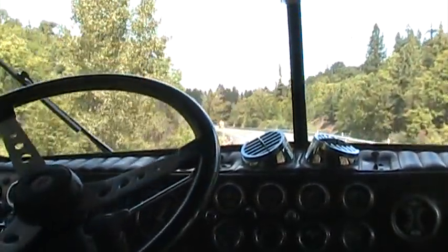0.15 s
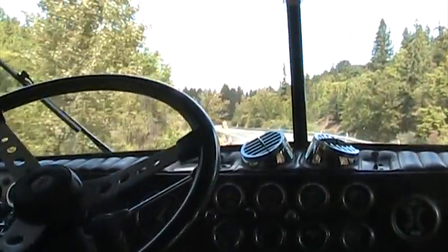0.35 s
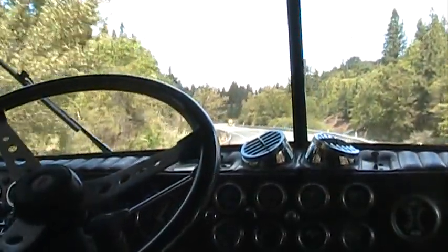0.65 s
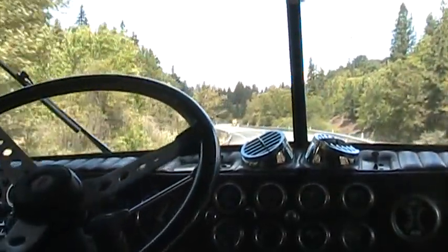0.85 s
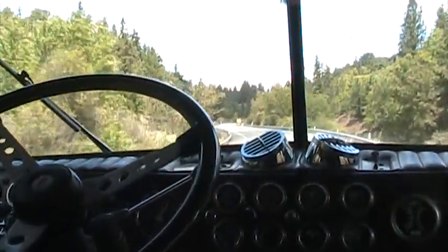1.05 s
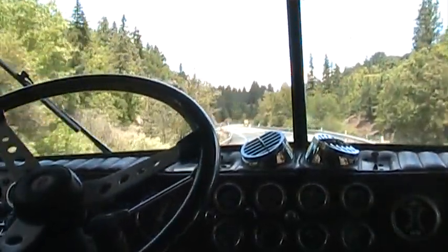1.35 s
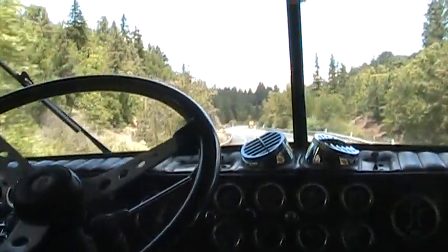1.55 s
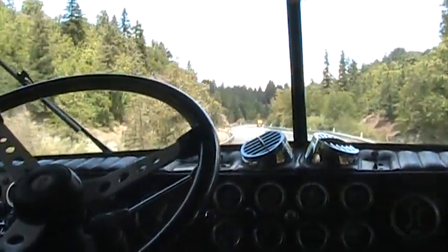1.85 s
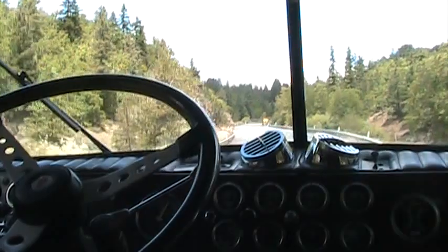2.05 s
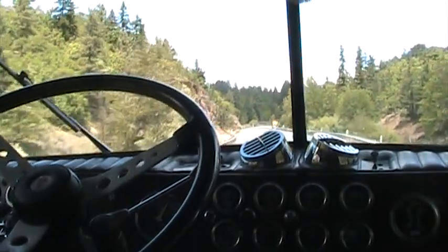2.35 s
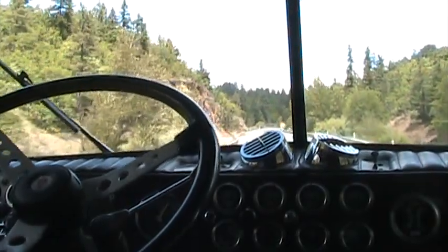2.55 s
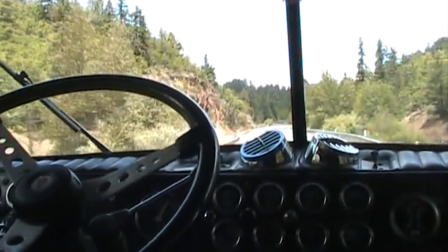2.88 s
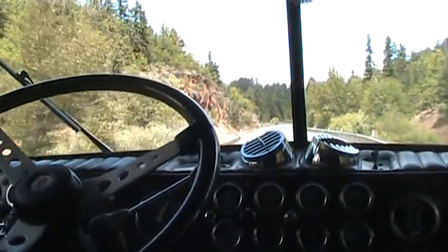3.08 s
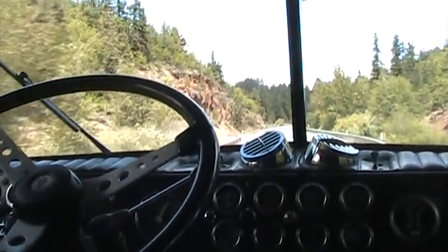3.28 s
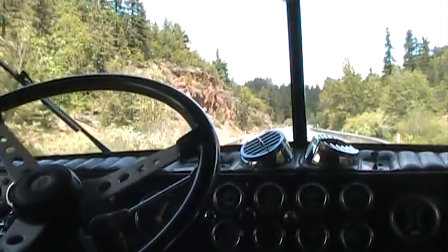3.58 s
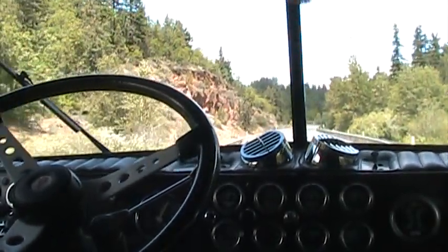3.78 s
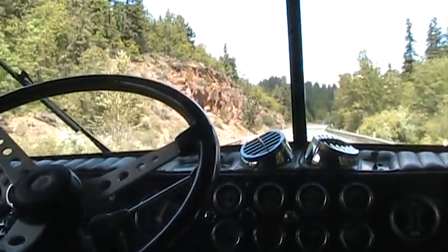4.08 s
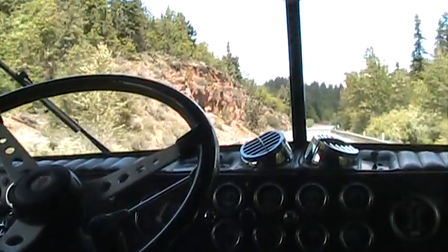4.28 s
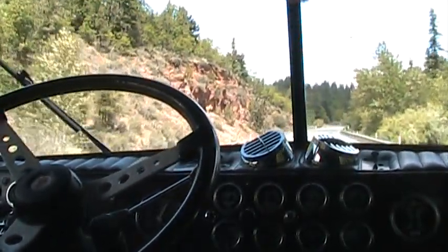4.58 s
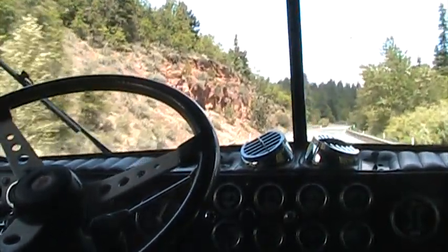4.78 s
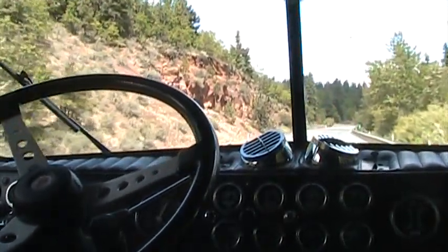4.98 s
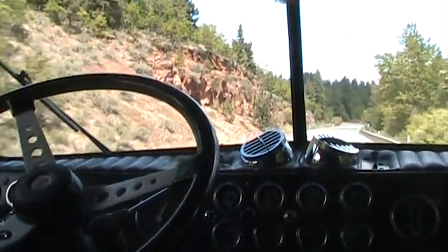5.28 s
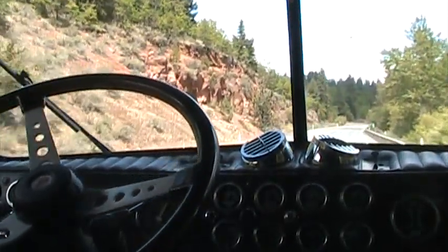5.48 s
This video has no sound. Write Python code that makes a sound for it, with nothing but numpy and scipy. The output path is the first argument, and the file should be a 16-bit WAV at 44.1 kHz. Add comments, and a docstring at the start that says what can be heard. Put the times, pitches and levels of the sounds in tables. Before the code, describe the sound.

A large diesel truck engine drones continuously for about five and a half seconds, heard from inside the cab on a climbing road. A deep, steady boom dominates from the start, with softer combustion knock and clatter above it and a low rumble of tyres and chassis all around. Faint tones from resonating cab panels swell and fade one after another, around 1, 2 to 3, and 5 seconds. Loose dashboard trim gives light, bright, irregular ticks throughout, a little clearer around 2.5, 3.3 and 4.8 seconds. The engine's pitch sinks very slightly over the whole stretch. From about 3 seconds the load builds, and between 4 seconds and the end the boom eases a little while the drone hardens and the clatter grows. The overall loudness stays nearly even.

```python
"""Diesel truck cab on a climb

A big diesel pulls up a mountain road at about 1930 rpm. Its firing note, six cycles a turn, booms
on an air resonance of the cab above the other crank orders (harmonics of the rotation). As the speed
sags and the load grows, the boom eases and the drone hardens. Combustion clatter and road rumble
fill the cab, panels resonate in turn, and loose dashboard trim ticks."""
import sys
import numpy as np
from scipy import signal
from scipy.fft import rfft, irfft, next_fast_len
from scipy.io import wavfile

SR = 44100
rng = np.random.default_rng(int(sys.argv[2]) if len(sys.argv) > 2 else 0)


def digitize_waveform(pressure):
    """Quantize a signal to 16-bit integers and store it at the path in sys.argv[1].

    Rows of a 2-D input are taken as channels; values are limited to [-1, 1].
    """
    field = np.atleast_2d(pressure).T
    bounded = np.clip(field, -1, 1)
    quanta = np.round(bounded * 32767).astype(np.int16)
    wavfile.write(sys.argv[1], SR, quanta)


N = 248283
T = np.arange(N) / SR

# Diffuseness of the cab's sound field: frequency_hz, side_minus_mid_db
CAB_WIDTH = [(40, -14.5), (200, -10.5), (550, -15.5), (800, -17), (1200, -4.5), (1700, -10), (2400, -11),
             (3100, -5), (4500, -8.5), (7000, -5.5), (9000, 0), (10800, 5.5), (13000, 7.5), (15500, 2)]


def amp(db):
    """Amplitude ratio of a level: tenfold for every 20 dB."""
    return np.exp(np.asarray(db) * (np.log(10) / 20))


def curve(rows):
    """Linear interpolation of (time_s, value) rows at every sample."""
    return np.interp(T, *np.transpose(rows))


def value_at(points, hz):
    """Interpolation of (frequency_hz, value) rows on a logarithmic frequency axis."""
    points_hz, value = np.transpose(points)
    return np.interp(np.log(hz + 1), np.log(points_hz + 1), value)


def colour(x, points):
    """Zero-phase filtering: the spectrum is multiplied by a (frequency_hz, gain_db) curve."""
    size = next_fast_len(N)
    gain = amp(value_at(points, np.fft.rfftfreq(size, 1 / SR)))
    return irfft(rfft(x, size) * gain, size)[..., :N]


def waver(cutoff_hz):
    """Random modulation: low-passed Gaussian noise of rms 1."""
    size, control_hz = 2048, 256
    hz = np.fft.rfftfreq(size, 1 / control_hz)
    slow = irfft(rfft(rng.standard_normal(size)) / (1 + (hz / cutoff_hz) ** 4))
    slow = np.interp(T * control_hz, np.arange(size), slow)
    return slow / np.sqrt(np.mean(slow ** 2) + 1e-20)


def stereo(mid, side):
    """Sum and difference of mid and side give left and right."""
    return np.array([mid + side, mid - side])


def diffuse(spectrum, envelope_db):
    """A partly diffuse field: modulated noise with independent mid and side, the mid at rms 1."""
    mid, side = colour(rng.standard_normal((2, N)) * amp(envelope_db), spectrum)
    return stereo(mid, colour(side, CAB_WIDTH)) / np.std(mid)


def tone(phase, hz, level_db):
    """Interaural phase difference: a side part in quadrature puts a tone out of step at the ears."""
    skew = 0.76 * amp(value_at(CAB_WIDTH, hz)) * rng.choice([-1, 1])
    return np.sqrt(2) * amp(level_db) * stereo(np.cos(phase), skew * np.sin(phase))


def order_phase(crank, order, smear_rad=0.2):
    """Phase dispersion: higher orders lag, so the cab smears each throb of the engine."""
    quadrature = order % 2 * np.pi / 2  # odd orders a quarter cycle from even: two throbs a turn
    return order * crank + quadrature - smear_rad * order * (order - 3)


def road(rumble_db=-25.5, swell_db=0.5, thump_db=-37.5, bump_db=3.0):
    """Random excitation: tyres and chassis rumble, and bumps rock the cab on its mounts."""
    # Road and chassis rumble: frequency_hz, relative_density_db
    rumble_spectrum = [(10, -28.5), (28, 1.5), (45, -5.5), (80, -8.5), (125, -1.5), (160, -3.5),
                       (185, -2.5), (200, 3), (230, -1), (340, -2), (440, -3), (700, -10.5), (1200, -25.5),
                       (6000, -84)]
    # Thump of the sprung cab: frequency_hz, relative_density_db
    thump_spectrum = [(12, -34.5), (27, -2), (44, 0.5), (56, 0.5), (110, -31.5), (500, -90.5)]
    rumble = diffuse(rumble_spectrum, -swell_db * waver(3.5))
    thump = diffuse(thump_spectrum, bump_db * waver(6))
    return amp(rumble_db) * rumble + amp(thump_db) * thump


def trim(rise_s=0.00043, ring_s=0.0015, tail_s=0.0061, tail_db=-19,
         bounce_s=0.004, bounce_db=-5, small_count=150):
    """Damped impacts: loose trim strikes and bounces twice, each contact a decaying noise burst."""
    # The loudest ticks: start_s, strength_db, body_minus_snap_db
    loud_ticks = [(0.3036, -35, -7), (0.4443, -33, 6), (0.9486, -36, 3), (1.1054, -37, -6),
                  (1.1796, -33, 0), (1.493, -34, 12), (1.7873, -33, 0), (2.3225, -36, 11),
                  (2.4412, -32, -10), (2.486, -35, 12), (2.567, -28.5, -5), (2.7101, -31.5, 8),
                  (3.19, -34, 9), (3.2788, -31.5, -8), (3.657, -33, 10), (3.7266, -37, 14),
                  (4.8188, -29.5, 6), (4.99, -34, -1), (5.1974, -35, 2), (5.234, -35, -4)]
    # Bright snap of a contact: frequency_hz, gain_db
    snap_spectrum = [(3000, -25.5), (6000, -1.5), (7500, 0.5), (8500, -5), (10000, -1), (11500, -5),
                     (13000, -8), (15800, -19.5)]
    when, chance = rng.random((small_count, 2)).T
    small_s = when * (T[-1] - 3 * bounce_s)
    small_db = np.minimum(-47 - 4.5 * np.log(chance), -38)
    small_ticks = np.column_stack([small_s, small_db, np.full(small_count, 2)])
    power = np.zeros((2, N))  # snap, body
    for start_s, strength_db, body_db in np.vstack([loud_ticks, small_ticks]):
        luck = rng.random(4)
        contact_s = start_s + 0.001 + bounce_s * np.cumsum([0, 0.5 + luck[0], 0.5 + luck[1]])
        contact_db = strength_db + bounce_db * np.array([0, 0.5 + luck[2], 1 + 2 * luck[3]])
        samples = np.clip((contact_s * SR).astype(int), 0, N - 1)
        power[:, samples] += amp([contact_db, contact_db + body_db]) ** 2
    t = T[:2048]
    ring = np.exp(-2 * t / ring_s) + amp(tail_db) ** 2 * np.exp(-2 * t / tail_s)
    ring *= 1 - np.exp(-t / rise_s)  # a brief fade-in slightly blunts each tick's onset
    snap_envelope, body_envelope = np.sqrt(abs(signal.oaconvolve(power, ring[None], axes=1)[:, :N]))
    snap = 2 * colour(snap_envelope * rng.standard_normal((2, N)), snap_spectrum)
    body_band = signal.butter(2, [3200, 5800], "bandpass", fs=SR, output="sos")
    body = 2 * signal.sosfilt(body_band, body_envelope * rng.standard_normal((2, N)))
    return stereo(*snap) + amp(-3) * stereo(body[0], 0.5 * body[1])


def accessory(crank, mean_hz, order=12.313, shake_db=0.6):
    """Beating: a driven accessory hums just above the twelfth order and interferes with it."""
    # Strength of the hum: time_s, level_db
    hum_levels = [(0, -26.5), (3, -32), (5.63, -25.5)]
    return tone(order * crank, order * mean_hz, curve(hum_levels) + shake_db * waver(4))


def combustion(crank, load, knock_db=-30, clatter_db=-38):
    """Amplitude-modulated noise: knock and clatter pulse unevenly with the crank and grow with load."""
    # Block and firewall knock: frequency_hz, relative_density_db
    knock_spectrum = [(150, -33.5), (300, -0.5), (420, 0), (560, 0.5), (630, -7), (690, 3), (790, 2.5),
                      (880, -7.5), (1100, -5), (1270, -14), (1400, -8.5), (1620, -12.5), (1900, -26),
                      (8000, -84.5)]
    # Injector and valve clatter with wind: frequency_hz, relative_density_db
    clatter_spectrum = [(1000, -25), (1700, -3), (2500, -5.5), (2900, -9), (3500, -9.5), (3800, -12),
                        (5000, -13), (6000, -19), (7000, -18), (8500, -23.5), (9700, -23), (11300, -31.5),
                        (13000, -40.5), (15700, -47.5)]
    turn, throb, firing = np.cos(crank), np.cos(2 * crank), np.cos(6 * crank)
    knock_swing_db = 2 * turn + throb + firing + 3 * load + 1.8 * waver(27)
    clatter_swing_db = 0.37 * turn + 0.7 * throb + 1.4 * load
    clatter_swing_db += 0.72 * waver(54) + 0.5 * waver(11)  # flutter and gusts
    knock = diffuse(knock_spectrum, knock_swing_db)
    clatter = diffuse(clatter_spectrum, clatter_swing_db)
    return amp(knock_db) * knock + amp(clatter_db) * clatter


def panel_lift_db(order):
    """Resonance: an order swells at a set time, as it slides through a cab panel's natural frequency."""
    # Panel resonances: order, peak_s, half_width_s, lift_db
    resonances = [(21, 0.2, 0.4, 7), (78.1, 1, 0.72, 16), (34, 0.77, 0.42, 15), (36, 2.15, 1.1, 11.5),
                  (51, 3, 1.6, 12), (46, 3.1, 0.44, 7), (24, 4.0, 0.31, 5.5), (30, 5.1, 0.8, 12.5)]
    return sum(lift_db / (1 + ((T - peak_s) / half_width_s) ** 2)
               for driver, peak_s, half_width_s, lift_db in resonances if round(driver) == order)


def drone(crank, mean_hz, load, shake_db=0.62, upper_shake_db=2):
    """Harmonic series: unequal cylinders sound multiples of the crank speed; load shifts the balance."""
    # Crank orders up to 28, without the firing note: order, easy_db, lugging_db
    lower_orders = [(1, -41, -47.5), (2, -42, -41), (3, -32.5, -35), (4, -35.5, -36), (5, -41.5, -46.5),
                    (7, -31.5, -40.5), (8, -34, -31), (9, -29.3, -23.5), (10, -34, -31.5), (11, -37, -27.3),
                    (12, -30.5, -33.5), (13, -40.5, -31), (14, -36, -42), (15, -32, -31), (16, -27.5, -29),
                    (17, -30, -24), (18, -34, -36), (19, -56, -38), (20, -39.5, -57), (21, -39.5, -31),
                    (22, -41.5, -58.5), (23, -33, -58), (24, -37, -34.5), (25, -46.5, -48),
                    (26, -55, -39.5), (27, -43.5, -55), (28, -46.5, -51.5)]
    # Spectral envelope of the higher orders: frequency_hz, level_db
    upper_envelope = [(930, -52), (1150, -55), (1270, -60), (1420, -51.5), (1650, -55.5), (1900, -58.5),
                      (2500, -61.5), (3000, -59)]
    levels_db = {round(order): easy_db + (lugging_db - easy_db) * load + shake_db * waver(8)
                 for order, easy_db, lugging_db in lower_orders}
    for order in range(29, 86):
        levels_db[order] = value_at(upper_envelope, order * mean_hz) + upper_shake_db * waver(3)
    return sum(tone(order_phase(crank, order), order * mean_hz, level_db + panel_lift_db(order))
               for order, level_db in levels_db.items())


def boom(crank, load, easy_db=-12.5, lugging_db=-15):
    """Cavity resonance: the firing note booms in the cab's air and weakens as it slips off under load."""
    shake_db = (0.23 + 0.4 * load) * waver(11)  # the ride shakes it more off resonance
    level_db = easy_db + (lugging_db - easy_db) * load + shake_db
    phase = order_phase(crank, 6)
    return np.sqrt(2) * amp(level_db) * stereo(np.cos(phase), 0.1 * np.sin(phase))


def scene():
    """Superposition: engine layers locked to one crankshaft add to the road and the trim."""
    # Crankshaft speed: time_s, rotation_hz
    crank_speeds = [(0, 32.8), (0.7, 32.5), (1.4, 32.44), (2.8, 32.06), (3.5, 32.04), (4.5, 31.8),
                    (5.63, 31.7)]
    # Engine labour (0 easy, 1 lugging, above 1 harder still): time_s, load
    engine_loads = [(0, 0.011), (1.2, -0.0098), (3.2, 0.18), (4.0, 0.42), (5.1, 1.07), (5.63, 1.32)]
    # Level difference between the ears: frequency_hz, left_minus_right_db
    ear_balance = [(30, -3.5), (110, -3), (200, -1), (380, 0), (700, -1), (1290, 2), (2380, 2), (4400, 0)]
    rotation_hz, load = curve(crank_speeds), curve(engine_loads)
    mean_hz = rotation_hz.mean()
    crank = 2 * np.pi * np.cumsum(rotation_hz) / SR + 0.0041 * waver(11)  # radians, slightly uneven
    tones = boom(crank, load) + drone(crank, mean_hz, load) + accessory(crank, mean_hz)
    cab = tones + combustion(crank, load) + road() + trim()
    return np.array([colour(ear, [(hz, sign * db / 2) for hz, db in ear_balance])
                     for ear, sign in zip(cab, (1, -1))])


def record(dry, cutoff_hz=15850):
    """Band limiting: a linear-phase low-pass filter removes the highest treble."""
    low_pass = signal.firwin(511, cutoff_hz, window=("kaiser", 9), fs=SR)
    return signal.oaconvolve(dry, low_pass[None], "same")


dry = scene()
out = record(dry)
digitize_waveform(out)
```